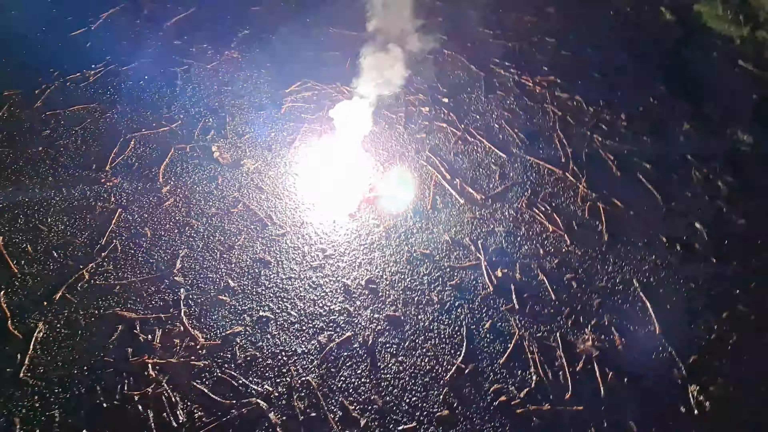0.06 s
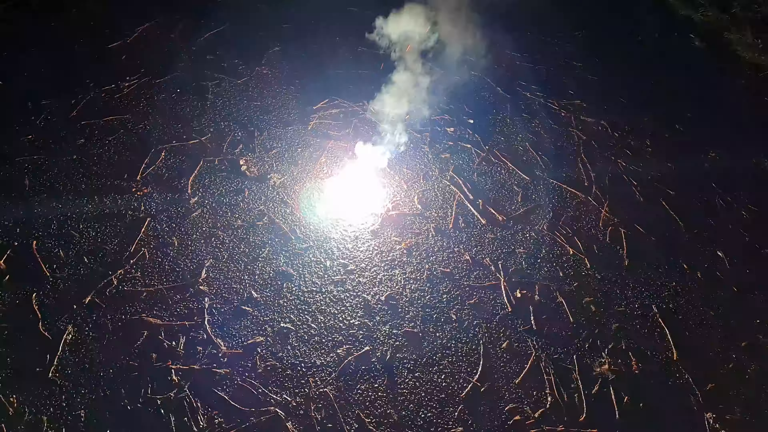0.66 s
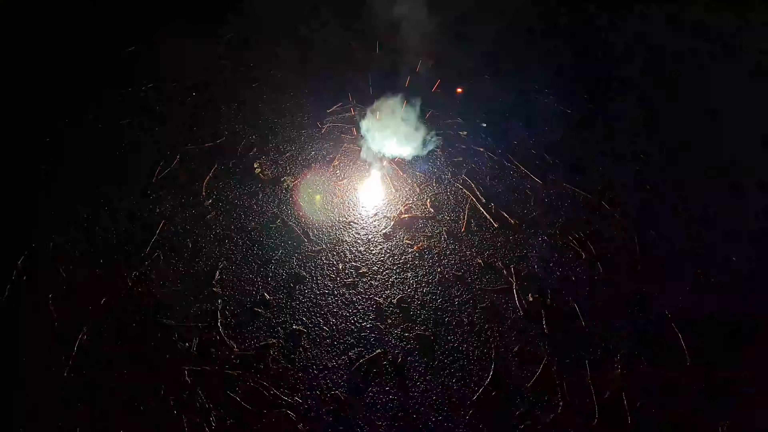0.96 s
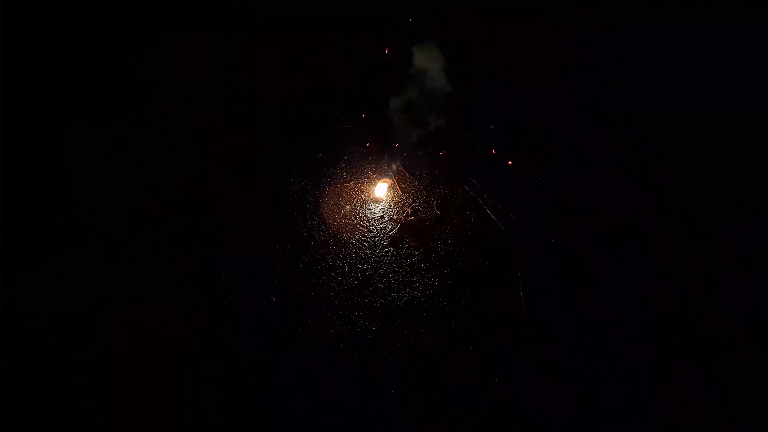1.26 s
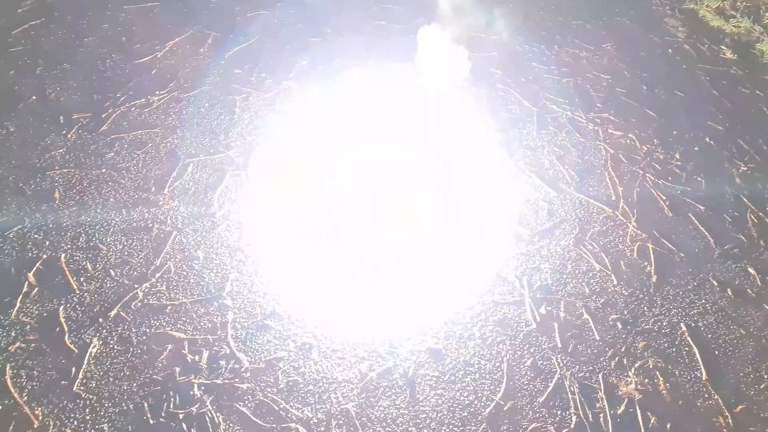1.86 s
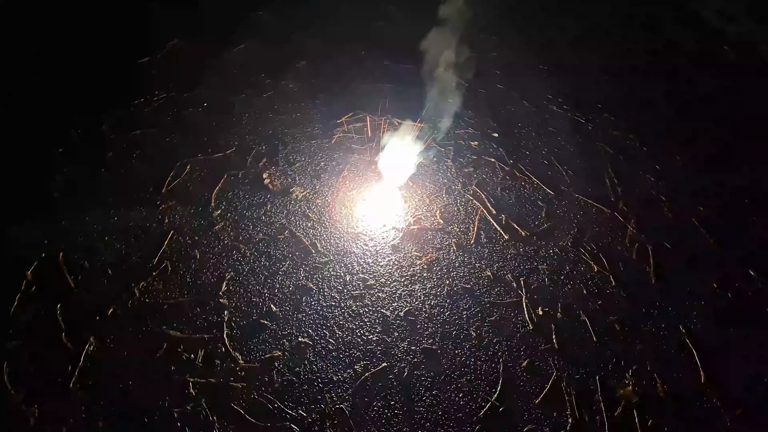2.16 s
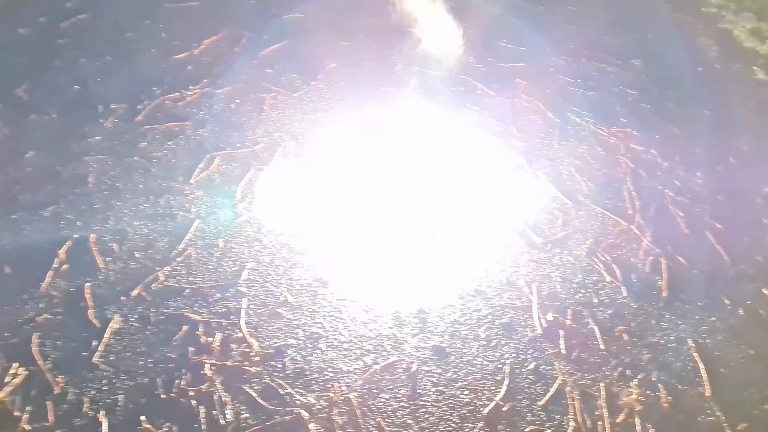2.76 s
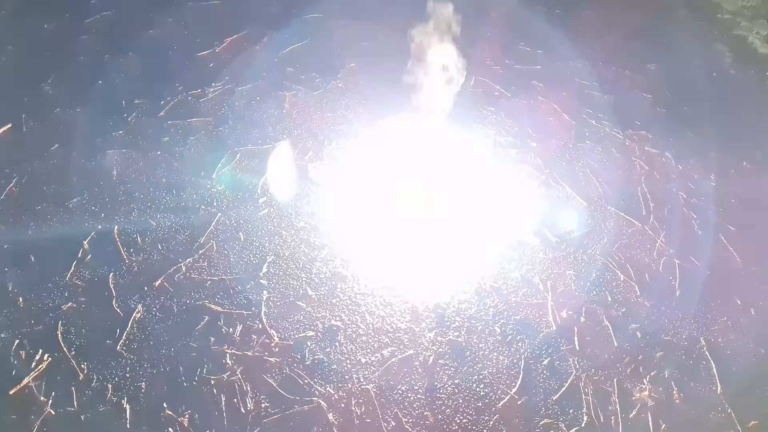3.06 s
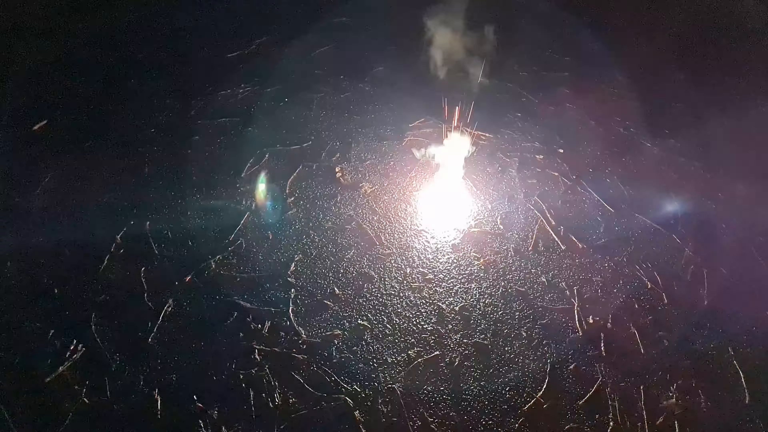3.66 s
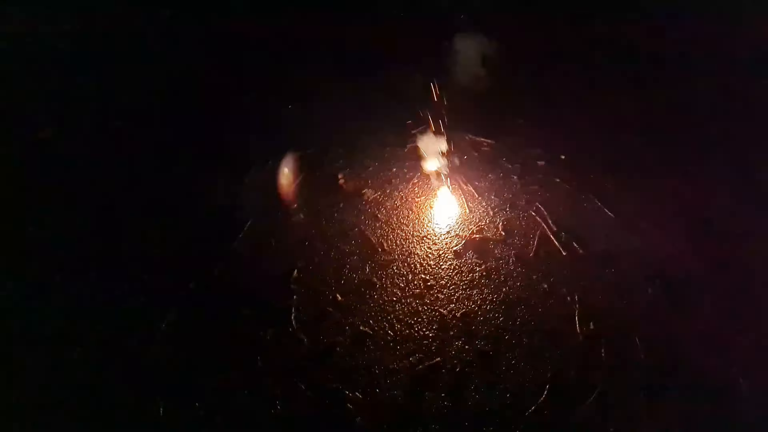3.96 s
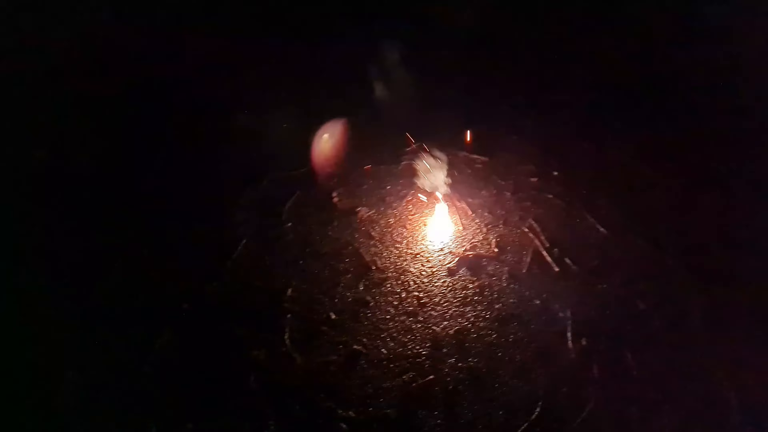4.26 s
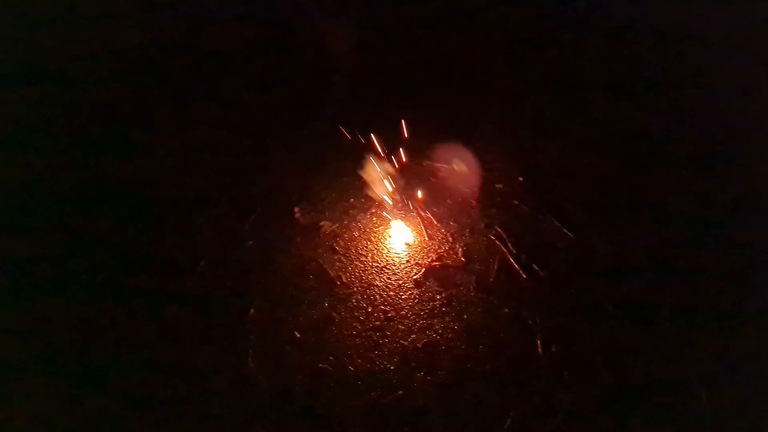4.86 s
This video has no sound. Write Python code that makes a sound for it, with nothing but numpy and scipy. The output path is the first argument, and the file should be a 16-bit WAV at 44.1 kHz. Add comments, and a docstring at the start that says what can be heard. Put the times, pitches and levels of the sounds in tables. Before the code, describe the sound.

A small strobe firework burns on asphalt a step or two from a hand-held phone. It flares about four or five times a second, each flare a short spurt of fizzing hiss, with several dull pops early on and faint spark snaps throughout. The spurts gradually thin out and weaken over a quiet smoulder. Light wind bumps the microphone, and a faint distant rush gains a breathy whirr after about three seconds.

```python
"""On asphalt at night, a strobe firework burns a step or two from a hand-held phone.
It smoulders with a faint hiss and flares a few times a second: each flare is a spurt of gas full of
fizzing grains, and some spit a dull pop. Thrown sparks snap faintly. Light wind nudges the two
microphones over a distant outdoor rush, where a breathy whirr comes up after about three seconds."""
import sys
import numpy as np
from scipy import signal
from scipy.fft import rfft, irfft
from scipy.io import wavfile
from scipy.ndimage import uniform_filter1d, map_coordinates

SR = 44100
rng = np.random.default_rng(int(sys.argv[2]) if len(sys.argv) > 2 else 0)


def store_wav(level_fs):
    """Save 16-bit WAV to argv[1]."""
    pcm = np.round(np.clip(np.atleast_2d(level_fs), -1, 1) * 32767)
    wavfile.write(sys.argv[1], SR, pcm.T.astype(np.int16))


N = 225733
TIME = np.arange(N) / SR
FREQ = np.fft.rfftfreq(N, 1 / SR)

# Each flare of the firework: peak_s, level_db, rise_s
FLARE_EVENTS = [(0.032, -41.5, 0.072), (0.165, -39.5, 0.046), (0.264, -37.5, 0.019), (0.368, -33.0, 0.031),
                (0.537, -34.5, 0.032), (0.645, -45.0, 0.035), (0.735, -32.5, 0.02), (0.92, -32.0, 0.022),
                (1.04, -47.5, 0.042), (1.112, -31.5, 0.022), (1.394, -32.0, 0.026), (1.59, -45.5, 0.046),
                (1.648, -30, 0.019), (1.898, -33.0, 0.027), (2.03, -54.0, 0.074), (2.124, -34, 0.031),
                (2.245, -49.0, 0.02), (2.424, -33.5, 0.028), (2.785, -36.0, 0.033), (3.121, -38, 0.033),
                (3.25, -46, 0.026), (3.328, -35, 0.023), (3.626, -36, 0.024), (3.703, -51.5, 0.017),
                (3.909, -39.5, 0.023), (4.193, -42, 0.037), (4.405, -41, 0.026), (4.795, -38.5, 0.026),
                (5.115, -48.5, 0.023)]
# The quiet burn between flares: time_s, level_db
SMOULDER_LEVEL = [(0, -42), (.45, -49.5), (.82, -51), (1.25, -58), (1.8, -63.5), (2.6, -61.5), (3.5, -61),
                  (4.3, -64.5), (5.1, -59)]
# How far the tube has burnt down: time_s, share_0_to_1
BURNT_SHARE = [(0, 0.13), (1.2, 0.52), (2.4, 0.64), (3.1, 0.66)]
# Tone of the gas jet's low roar: frequency_hz, gain_db
ROAR_TONE = [(60, -25), (150, -10), (300, -2), (600, -5), (900, -6.5), (1400, -12.5), (3000, -20)]
# Tone of the hissing gas, sharper as the tube burns down: frequency_hz, fresh_db, burnt_db
HISS_TONE = [(384, -24, -23), (1010, 3.5, -3.5), (1430, 0, -4.5), (2780, 4.5, -2), (4900, -5, 1),
             (6900, -18.5, -2), (8380, -32, -2), (8880, 0, -44), (11000, -44, -29), (15600, -6, -7)]
# Tone of the fizzing grains: frequency_hz, fresh_db, burnt_db
FIZZ_TONE = [(4000, -42, -8), (6460, -13, -31), (8000, 2.5, -10), (8670, -17, -29), (10020, 0.5, -2.5),
             (12600, -6, 7), (14700, -1.5, 8), (16500, -14.5, 1)]
# How much later the right microphone hears the jet as the phone sways: time_s, lag_ms
RIGHT_MIC_LAG = [(0, 0.088), (.93, 0.033), (2.14, 0.065), (2.78, 0.018), (3.55, -0.0039), (4.2, 0.0026),
                 (4.8, 0.065)]
# How the phone's case bends sound: frequency_hz, left_minus_right_db, left_lead_rad
CASE_BEND = [(680, 0, -1), (1355, -3.5, 2), (1490, 2, -0.5), (2490, -3.5, -0.18), (3230, -0.5, .5),
             (4100, -0.5, 0), (5660, -2, 0.5), (8140, 0, 1.73), (11700, 5.5, 4.5), (12600, 3, 1.9),
             (16700, 1, 5)]
# The breeze between gusts: time_s, level_db
BREEZE_LEVEL = [(0, -41.5), (.7, -61.5), (1.05, -64), (1.45, -68), (1.8, -61), (2.3, -68.5), (3, -64.5),
                (3.6, -55), (4.35, -59.5), (5.1, -53.5)]
# Each gust on the microphones: peak_s, level_db, length_s
GUST_EVENTS = [(0.154, -32, 0.0092), (0.301, -34.5, 0.023), (0.39, -40.5, 0.017), (0.476, -41, 0.029),
               (0.565, -38.5, 0.015), (0.757, -42.5, 0.0075), (0.948, -44.5, 0.058), (1.136, -37, 0.025),
               (1.245, -43, 0.024), (1.918, -48.5, 0.012), (3.14, -50, 0.021), (3.39, -49.5, 0.021),
               (3.557, -44.5, 0.019), (3.777, -52, 0.033), (4.258, -47.5, 0.035), (4.53, -47, 0.011),
               (4.624, -46, 0.013), (4.697, -46, 0.022), (4.845, -41, 0.036)]
# Tone of the wind's rumble: frequency_hz, gain_db
WIND_TONE = [(20, -17.5), (35, -40), (55, 2), (80, -4), (125, -3.5), (190, -17), (300, -17.5), (700, -48)]
# Loudness of the distant rush: time_s, level_db
DISTANT_LEVEL = [(0, -62), (2, -58), (2.7, -59), (3.1, -56), (3.6, -56.5), (4.3, -54), (4.7, -54),
                 (5.1, -57)]
# Tone of the distant rush: frequency_hz, gain_db
DISTANT_TONE = [(40, 4), (120, -11), (330, 1), (550, -1.5), (900, -4), (1300, -1), (1750, -8.5), (2100, -6),
                (2600, -12), (4500, -19.5), (9000, -34), (16000, -32.5)]
# Dull pops and low thumps: start_s, level_db, pitch_hz, fade_s (time to drop 60 dB)
POP_EVENTS = [(0.14, -31, 446, 0.027), (0.295, -30.5, 393, 0.034), (0.366, -29, 493, 0.012),
              (0.55, -21, 498, 0.011), (0.7148, -28, 490, 0.02), (0.733, -28.5, 376, 0.027),
              (.927, -28.5, 550, 0.03), (1.124, -33, 294, 0.048), (2.0062, -38.5, 600, 0.016),
              (2.041, -49, 700, 0.011), (2.427, -40, 174, 0.051), (3.133, -41, 63.5, 0.25),
              (3.53, -38.5, 64.3, 0.36), (4.668, -38.5, 361.7, 0.012), (4.701, -36.5, 250, 0.013)]
# Tone of a flying spark: frequency_hz, gain_db
SPARK_TONE = [(1200, -20), (3500, 28), (8000, -21), (15000, -6)]
# The whirr within the rush: time_s, pitch_hz, level_db
WHIRR_PATH = [(0, 1602, -72), (2.7, 1600, -74), (3.2, 1682, -60), (3.6, 1818, -57), (4.2, 1791, -57),
              (4.7, 1824, -56.5), (5.1, 1750, -63)]


def undb(db):
    """Turn decibels into a number to multiply by."""
    return 10 ** (np.asarray(db) / 20)


def curve(rows):
    """Join a table's points into lines through time, one for each column after the first."""
    times, *columns = np.transpose(rows)
    return [np.interp(TIME, times, column) for column in columns]


def colour(sound, tone):
    """Give a sound the tone of a table, then scale it to an average (rms) strength of 1."""
    hz, db = np.transpose(tone)
    gain = undb(np.interp(np.log(FREQ + 1), np.log(hz), db))
    shaped = irfft(rfft(sound) * gain, N)
    return shaped / np.std(shaped)


def wander(rate_hz):
    """A random drift, typically 1 up or down, that turns about rate_hz times a second."""
    return 1.2 * np.interp(TIME * rate_hz, np.arange(8192), rng.standard_normal(8192))


def swell(peak_s, rise_s, fall_s):
    """Grow faster and faster up to 1 at peak_s, linger, and die away."""
    gap_s = np.abs(TIME - peak_s)
    drop = np.where(TIME < peak_s, (gap_s / rise_s) ** 1.08, (gap_s / fall_s) ** 1.87)
    return np.exp(-drop.clip(0, 20))


def split_power(power, fizz_db, roar_fresh_db=-1, roar_burnt_db=-9):
    """Share power between hiss and fizz, and add a roar that weakens as the tube burns down."""
    roar_db = roar_fresh_db + (roar_burnt_db - roar_fresh_db) * curve(BURNT_SHARE)[0]
    hiss_db = np.zeros(N)  # roar and fizz are set against the hiss
    return power * undb([roar_db, hiss_db, fizz_db]) ** 2 / (1 + undb(fizz_db) ** 2)


def burn(fall_ratio=1.643):
    """Strength of roar, hiss and fizz: flares stand out of a duller smoulder; both slowly lose fizz."""
    flares = sum((undb(db) * swell(peak_s, rise_s, fall_ratio * rise_s)) ** 2
                 for peak_s, db, rise_s in FLARE_EVENTS)
    smoulder = undb(curve(SMOULDER_LEVEL)[0]) ** 2
    return np.sqrt(split_power(flares, fizz_db=1.5 - TIME)
                   + split_power(smoulder, fizz_db=0.5 - 1.5 * TIME))


def grains(spread_db, per_second=26000):
    """Three separate streams of dense, tiny bursts of uneven size."""
    size = undb(spread_db * np.minimum(rng.exponential(size=(3, N)), 4))
    bursts = rng.random((3, N)) < per_second / SR
    return bursts * rng.standard_normal((3, N)) * size


def vent(sound, tones):
    """The tube colours the jet, blending from its fresh tone towards its burnt-down one."""
    tones = np.array(tones)
    burnt = curve(BURNT_SHARE)[0]
    return (1 - burnt) * colour(sound, tones[:, [0, 1]]) + burnt * colour(sound, tones[:, [0, 2]])


def jet(churn_db=2, sputter_db=0.76, surge_fresh_db=2.5, surge_burnt_db=0.87):
    """Swirling gas roars and hisses, burning grains fizz.
    Three parts: one heard by both microphones, plus separate left and right ones for stereo width."""
    roar_gain, hiss_gain, fizz_gain = burn()
    roar = roar_gain * undb(churn_db * wander(150)) * colour(rng.standard_normal((3, N)), ROAR_TONE)
    hiss = hiss_gain * undb(-1.1) * vent(grains(spread_db=-1.16), HISS_TONE)
    fizz = fizz_gain * undb(-0.52) * vent(grains(spread_db=4.0), FIZZ_TONE)
    # all of it sputters together; the fresh flame surges more unevenly
    surge_db = surge_fresh_db + (surge_burnt_db - surge_fresh_db) * curve(BURNT_SHARE)[0]
    return (roar + hiss + fizz) * undb(sputter_db * wander(260) + surge_db * wander(45))


def near_echoes(sound, level_db=-7, spread_s=0.003, sway_hz=4, count=14):
    """Small echoes off hand and ground come and go at each microphone as phone and flame move."""
    lag_s = 0.0004 + spread_s * rng.exponential(size=(2, count))
    mics = [sum(wander(sway_hz) * np.pad(sound, (lag, 0))[:N] for lag in mic_lags)
            for mic_lags in (lag_s * SR).astype(int)]
    return undb(level_db) * np.array(mics) / np.sqrt(count)


def far_echoes(sound, fade_s=1.0, level_db=-27):
    """The surroundings send back a faint, blurred tail."""
    age = TIME[:SR]
    tail = rng.standard_normal((2, len(age))) * np.exp(-np.log(1000) * age / fade_s)
    tail /= np.linalg.norm(tail, axis=1, keepdims=True)
    return undb(level_db) * signal.fftconvolve(sound[None], tail, axes=1)[:, :N]


def delay(sound, lag_ms):
    """Make a sound arrive late by a steady or changing time."""
    return map_coordinates(sound, [np.arange(N) - lag_ms * SR / 1000], order=5)


def at_phone(sound, bounce_ms=1.312, bounce_db=-17):
    """The sound and its bounce off the asphalt bend round the phone's case to both microphones."""
    sound = sound + undb(bounce_db) * delay(sound, bounce_ms + 0.0095 * wander(1.6))
    right = delay(sound, curve(RIGHT_MIC_LAG)[0])
    mics = np.array([sound, right]) + near_echoes(sound) + far_echoes(sound)
    hz, shade_db, lead_rad = np.transpose(CASE_BEND)
    bend = np.log(undb(np.interp(FREQ, hz, shade_db))) + 1j * np.interp(FREQ, hz, lead_rad)
    # each side gets half the bend, in opposite directions
    return irfft(rfft(mics) * np.exp(np.outer([1, -1], bend) / 2), N)


def airflow(waver_db=2.5, puff_db=-16.5, puff_late_s=0.025, puff_s=0.018):
    """Strength of the moving air: a wavering breeze, its gusts, and a puff pushed out by each flare."""
    breeze = undb(curve(BREEZE_LEVEL)[0] + waver_db * wander(14))
    gusts = [undb(db) * swell(peak_s, 1.9 * length_s, 1.58 * length_s)
             for peak_s, db, length_s in GUST_EVENTS]
    puffs = [undb(db + puff_db) * swell(peak_s + puff_late_s, puff_s, puff_s)
             for peak_s, db, _ in FLARE_EVENTS]
    return np.linalg.norm([breeze, *gusts, *puffs], axis=0)


def wind(gain_db=1, right_louder_db=5.5, shared=0.63):
    """Swirls of air thump on the microphones, mostly on each alone and harder on the right."""
    swirls = colour(rng.standard_normal((2, N)) + shared * rng.standard_normal(N), WIND_TONE)
    # even them out, so that the airflow sets their strength
    swirls /= np.sqrt(uniform_filter1d(np.mean(swirls ** 2, axis=0), size=3000))
    side_db = np.array([[-right_louder_db], [right_louder_db]]) / 2
    return swirls * airflow() * undb(gain_db + side_db)


def distant_rush(waver_db=1, width=0.89, bass_hz=450):
    """A broad, far-off rush that slowly grows; its bass is alike in both ears."""
    middle, side = rng.standard_normal((2, N))
    side = width * irfft(rfft(side) * FREQ / np.hypot(FREQ, bass_hz), N)
    rush = colour(np.array([middle + side, middle - side]), DISTANT_TONE)
    return rush * undb(curve(DISTANT_LEVEL)[0] + waver_db * wander(15))


def pops(rise_s=0.00011, pitch_sag=0.31):
    """A pocket of gas bursts or a low thump lands: a few soft pressure swings that sag in pitch."""
    sound = np.zeros(N)
    for start_s, db, pitch_hz, fade_s in POP_EVENTS:
        age = np.maximum(TIME - start_s, 0)
        rise = 1 - np.exp(-age / rise_s)
        fade = np.exp(-np.log(1000) * np.minimum(age / fade_s, 10))
        sagging_hz = (age > 0) * pitch_hz * (1 - pitch_sag * (1 - fade))
        phase = 2 * np.pi * np.cumsum(sagging_hz) / SR
        sound -= 2 * undb(db) * rise * fade * np.sin(phase)
    return sound


def sparks(per_second=9, level_db=-40, spread_db=3):
    """Now and then a thrown spark snaps, faintly."""
    snaps = (rng.random(N) < per_second / SR) * undb(spread_db * rng.standard_normal(N))
    return undb(level_db) * colour(snaps, SPARK_TONE) * np.std(snaps)


def whirr(half_width_hz=130, waver_hz=75, shared=0.7):
    """A far, breathy band of noise whose pitch wavers and creeps upward."""
    pitch_hz, db = curve(WHIRR_PATH)
    real, imag = rng.standard_normal((2, 2, N)) + shared * rng.standard_normal((2, 1, N))
    low_pass = signal.butter(2, half_width_hz, fs=SR, output="sos")
    slow_noise = signal.sosfilt(low_pass, real + 1j * imag)
    phase = 2 * np.pi * np.cumsum(pitch_hz + waver_hz * wander(14)) / SR
    band = np.real(slow_noise * np.exp(1j * phase))  # lifts the noise up to the pitch
    return band / np.std(band) * undb(db)


def scene():
    """The firework, the wind and the night around them, in stereo."""
    shared, *width = jet()
    firework = at_phone(shared + pops() + sparks()) + undb(-7.5) * np.array(width)
    return firework + wind() + distant_rush() + whirr()


def record(dry):
    """The phone steeply cuts the treble above 15850 Hz."""
    return signal.sosfilt(signal.ellip(12, 0.2, 80, 15850, fs=SR, output="sos"), dry)


dry = scene()
out = record(dry)
store_wav(out)
```